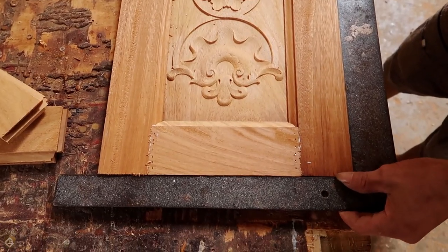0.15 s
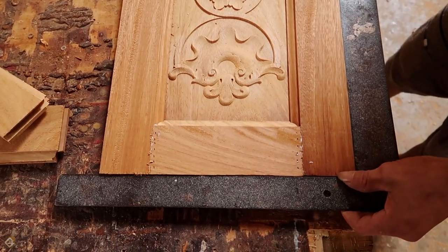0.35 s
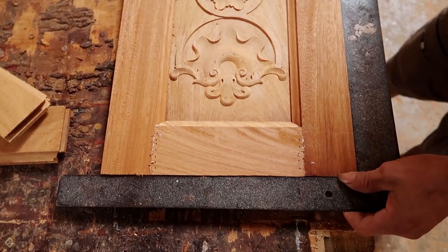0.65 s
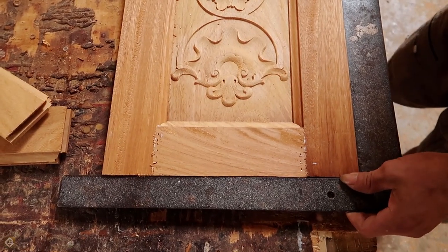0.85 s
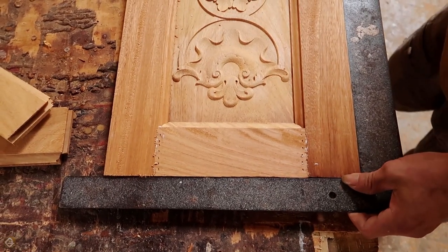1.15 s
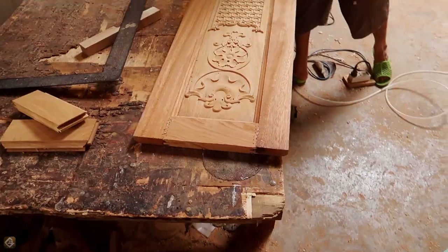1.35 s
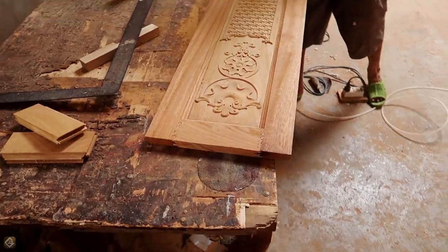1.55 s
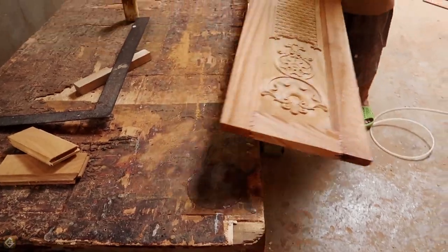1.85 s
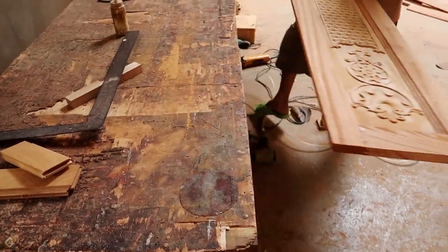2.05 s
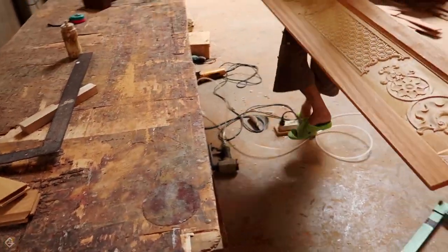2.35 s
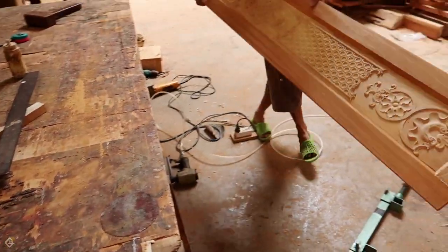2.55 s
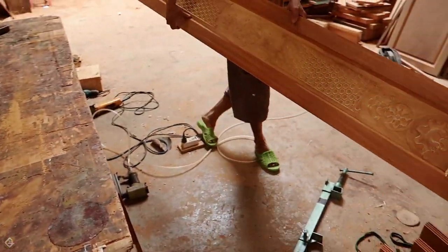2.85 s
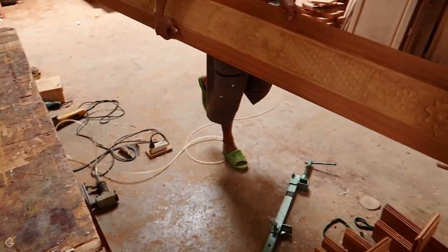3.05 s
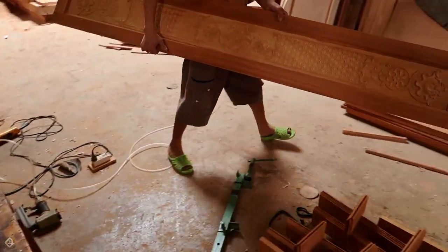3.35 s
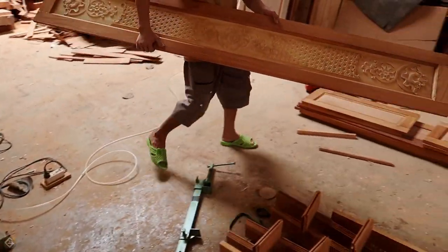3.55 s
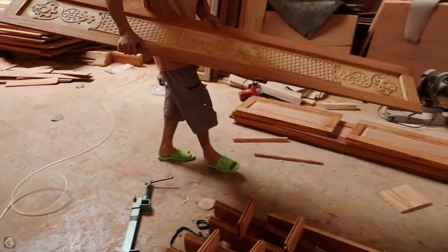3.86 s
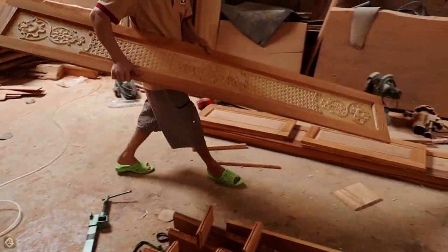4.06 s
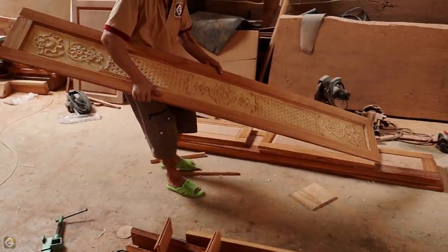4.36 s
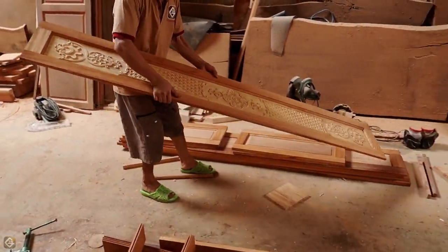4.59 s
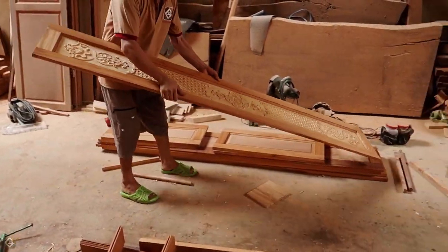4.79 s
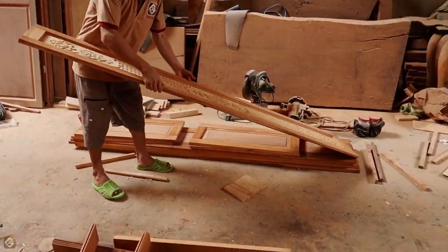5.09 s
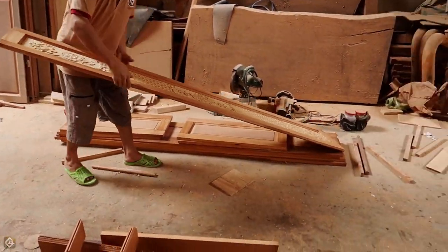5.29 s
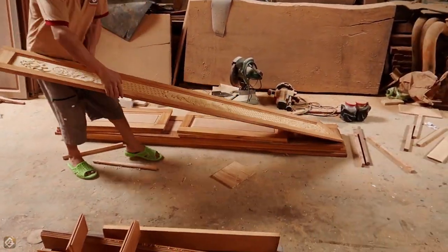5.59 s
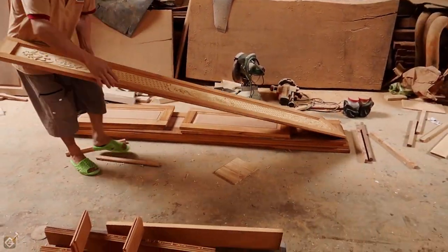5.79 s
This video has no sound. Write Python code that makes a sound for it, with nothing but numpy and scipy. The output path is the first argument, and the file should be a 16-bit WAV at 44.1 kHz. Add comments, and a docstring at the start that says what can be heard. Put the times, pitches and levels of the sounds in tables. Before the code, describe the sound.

Close, dry workshop sound: a rough low buzz with faint irregular rattling runs steadily over a soft hush. Against it come brief bursts of wood handling: bright clicks and a scrape, a solid knock, a crisp scratchy lift with a thin squeak, then one low thump. Mostly motor follows, until the panel is put down with several woody bumps, snaps and final squeaking slides. Nearly central, narrow stereo image.

```python
"""A small motor buzzes close by: one blunt pulse a turn excites its housing, and a loose part knocks on some
turns, as decaying modes. Close at hand, things scrape, click and thump: modulated noise gives gritty scrapes,
resonated bursts and spikes give sharp clicks and snaps, damped low modes give dull thumps, and narrow-band
noise squeaks. A faint hush lies behind."""
import sys
import numpy as np
from scipy.fft import rfft, irfft, next_fast_len
from scipy.io import wavfile
from scipy.ndimage import map_coordinates

SR = 44100
rng = np.random.default_rng(int(sys.argv[2]) if len(sys.argv) > 2 else 0)


def unload_wav(signal):
    """Save mono or channel-first audio to the path in sys.argv[1] as 16-bit WAV at rate SR, clipped to [-1, 1]."""
    wavfile.write(
        sys.argv[1],
        SR,
        np.round(np.clip(np.atleast_2d(signal).T, -1, 1) * 32767).astype(np.int16),
    )


N = 261513
T = np.arange(N) / SR


def amp(db):
    """Level in decibels to amplitude ratio."""
    return 10 ** (np.asarray(db) / 20)


def unit(x):
    """Normalisation to an rms of 1."""
    return x / np.sqrt(np.mean(x ** 2) + 1e-20)


def curves(rows):
    """Linear interpolation in time: one value per sample for each column after the time."""
    s, *columns = np.transpose(rows)
    return [np.interp(T, s, column) for column in columns]


def filtered(x, response):
    """Linear filtering: the spectrum of x times a complex response of frequency."""
    size = next_fast_len(N + SR // 4)
    hz = np.fft.rfftfreq(size, 1 / SR)
    return irfft(rfft(x, size) * response(hz), size)[..., :N]


def colour(points):
    """Spectral envelope: decibels interpolated on a logarithmic frequency axis."""
    f, db = np.transpose(points)
    return lambda hz: amp(np.interp(np.log(hz + 1), np.log(f + 1), db))


def body(peaks):
    """Modal superposition: causal second-order resonances summed with alternating signs."""
    def response(f):
        total = 0
        for k, (centre, width, db) in enumerate(peaks):
            resonance = 1j * f * width / (centre * centre - f * f + 1j * f * width)
            total = total + (-1) ** k * amp(db) * resonance
        return total
    return response


def ringing(modes, t, scatter_db):
    """Free vibration: exponentially damped sines, each struck at a new random strength."""
    total = 0
    for hz, db, t60 in modes:
        strength_db = db + scatter_db * rng.standard_normal()
        total = total + amp(strength_db - 60 * t / t60) * np.sin(2 * np.pi * hz * t)
    return total


def add(track, s, sound):
    """Superposition: mix a sound into the track at time s."""
    part = track[round(s * SR):][:len(sound)]
    part += sound[:len(part)]


def gritty(spectrum, rate, depth_db):
    """Amplitude-modulated noise of rms 1: its level takes a new random value rate times a second."""
    values = rng.standard_normal(int(N * rate / SR) + 4)
    jumps = map_coordinates(values, [T * rate], order=1)
    noise = amp(depth_db * jumps) * rng.standard_normal(N)
    return unit(filtered(noise, colour(spectrum)))


def swell(s, hold, rise, fall):
    """Exponential growth and decay: power climbs to 0 dB at s, holds and sinks, straight in dB."""
    return amp(-rise * np.maximum(s - T, 0) - fall * np.maximum(T - s - hold, 0)) ** 2


def motor():
    """Source and resonator: one push a turn through the housing; knocks fall on whole turns."""
    # nominal speed before alignment to the knocks: time_s, turns_per_s
    speed = [(0, 64), (.22, 68), (.4, 66), (.75, 59), (1, 56.5), (1.3, 55), (1.7, 52.8), (1.9, 53.5),
             (2.3, 60), (3, 60.7), (3.4, 64), (3.8, 61), (3.95, 59), (4.14, 52.8), (4.35, 56), (5.1, 57.5),
             (5.5, 59.5), (5.93, 60)]
    # rms level of the buzz: time_s, level_db
    buzz_level = [(0, -56), (1.2, -59), (4, -57.5), (4.5, -59.5), (5.93, -57.5)]
    # housing resonances: centre_hz, width_hz, gain_db
    housing = [(231, 51, 3.5), (310, 22, -3.5), (427, 40, -2.5), (542, 121, 1), (834, 108, -8),
               (1006, 33, -5.5), (1420, 40, -24)]
    # knocks of the loose part: start_s, level_db
    knocks = [(.0064, -45.5), (0.0858, -48), (0.1612, -45.5), (0.2621, -47), (0.8741, -49.5), (.946, -45.5),
              (1.0187, -45), (1.288, -49), (1.3771, -45.5), (1.4497, -48.5), (1.5816, -52.5), (1.6392, -55),
              (1.695, -55.5), (1.8092, -52.5), (1.8658, -51), (1.922, -46.5), (2.403, -48), (2.502, -46),
              (2.616, -47.5), (2.7137, -44.5), (2.8125, -45.5), (2.929, -45.5), (3.028, -45),
              (3.1258, -47.5), (3.2233, -45.5), (3.318, -46), (3.4103, -44.5), (3.5051, -47), (3.583, -55),
              (3.6966, -48), (3.781, -45.5), (3.8775, -47), (3.962, -46.5), (4.0514, -47), (4.2599, -46.5),
              (4.349, -46), (4.4189, -47.5), (4.492, -49.5), (5.3696, -45.5), (5.453, -46.5), (5.5211, -46)]
    turns = np.cumsum(curves(speed)[0]) / SR
    # shift the turn count so that each knock meets a whole turn
    knock_s = np.transpose(knocks)[0]
    seen = np.interp(knock_s, T, turns)
    whole = np.cumsum(np.r_[0, np.round(np.diff(seen))])
    turns += np.interp(T, knock_s, whole - seen)

    # each push comes 0.04 turn ahead of the whole turn, with jitter of 0.15 ms and 1.5 dB
    starts = np.flatnonzero(np.diff(np.floor(turns + .04)) > 0)
    late, size = rng.standard_normal((N // 600, 2))[:len(starts)].T
    jitter = np.round(.00015 * SR * late).astype(int)
    pushes = np.zeros(N)
    pushes[np.clip(starts + jitter, 0, N - 1)] = amp(1.5 * size)
    # noisy chatter dies away within each turn
    chatter = .03 * np.exp(-(turns % 1) / .3) * rng.standard_normal(N)
    buzz = amp(curves(buzz_level)[0]) * unit(filtered(pushes + chatter, body(housing)))

    shove_db = 38.5  # impulse into the housing, over the knock
    rattle_mean_db, rattle_scatter_db = -11.5, 1.5  # rattle relative to the knock
    # second landing relative to the first
    rebound_s, rebound_db, rebound_scatter_db, rebound_rattle_db = 0.053, -9, 4.2, -4.5
    shoves = np.zeros(N)
    for s, db in knocks:
        rattle_db = rattle_mean_db + rattle_scatter_db * rng.standard_normal()
        shoves[round(s * SR)] = amp(db + shove_db)
        add(buzz, s, knock(db, rattle_db))
        # the part rebounds and lands again, as a rule more softly
        landing_db = db + rebound_db + rebound_scatter_db * rng.standard_normal()
        add(buzz, s + rebound_s, knock(landing_db, rattle_db + rebound_rattle_db))
    return buzz + filtered(shoves, body(housing))


def hush(level_db, rate):
    """Broadband background: coloured noise of slowly fluctuating level."""
    # spectral envelope of the hush: frequency_hz, relative_density_db
    air = [(150, -17.5), (300, -5), (600, -2), (1100, -21.5), (1500, -12.5), (2200, -20.5), (3500, -27),
           (5200, -24.5), (7300, -26), (11000, -34), (16000, -34)]
    return amp(level_db) * gritty(air, rate, depth_db=5.5)


def dragging():
    """Sliding friction: grit crackles, a duller noise hisses and a low rumble swells beneath."""
    # strokes: full_level_s, hold_s, rise_db_per_s, fall_db_per_s, grit_db, hiss_db, rumble_db
    strokes = [(0, 0.22, 60, 33, -72.5, -64, -61.5), (.46, 0.043, 64, 60, -64, -59, -53),
               (0.575, 0.044, 316, 96, -51, -46.5, -44), (0.96, 0.24, 20, 49, -66.5, -59, -59),
               (2.009, 0.011, 395, 114, -40.5, -41.5, -46.5), (2.135, 0.086, 148, 88, -48.5, -47, -51),
               (2.4, 0.16, 153, 40, -70, -66, -59.5), (3.495, 0.36, 14.5, 32, -67.5, -64, -63.5),
               (4.125, 0.028, 67, 86, -61.5, -60, -59.5), (4.555, 0.0079, 280, 108, -51.5, -51, -48),
               (4.695, 0.013, 94, 198, -54, -56, -39.5), (4.762, 0.092, 400, 44, -57, -49, -51.5),
               (5.056, 0.077, 73, 121, -61.5, -55.5, -52), (5.575, .03, 900, 100, -59, -56, -66),
               (5.631, 0.085, 300, 79, -45, -47, -53), (5.784, 0.078, 114, 77, -43, -42.5, -51)]
    # spectral envelope of crackling grit: frequency_hz, relative_density_db
    grit_spectrum = [(1760, -13), (3000, -5.5), (3810, -3.5), (4260, -5), (5180, -10.5), (6000, -5.5),
                     (7200, -3), (8640, -5.5), (10100, -6.5), (11000, -12), (12100, -14), (13900, -16.5),
                     (16000, -30)]
    # spectral envelope of the duller hiss: frequency_hz, relative_density_db
    hiss_spectrum = [(150, -0.5), (250, 6), (280, 3.5), (429, -1), (854, -1.5), (1450, -1.5), (2710, -7),
                     (3840, -16.5), (5000, -7.5), (6500, -9.5), (11000, -120)]
    # spectral envelope of the rumble: frequency_hz, relative_density_db
    rumble_spectrum = [(12, -33), (20, -36), (43, -5), (70, 2.5), (187, -5.5), (259, -8), (290, -6),
                       (600, -10.5), (780, -49), (1320, -120)]
    floor_db = -71.5  # steady rumble, also between strokes
    # independent strokes add in power
    power = sum(amp(row[4:])[:, None] ** 2 * swell(*row[:4]) for row in strokes)
    grit_level, hiss_level, rumble_level = np.sqrt(power)
    grit = grit_level * gritty(grit_spectrum, rate=600, depth_db=3.0)
    dull = hiss_level * gritty(hiss_spectrum, rate=400, depth_db=3.0)
    rumble_level = np.hypot(rumble_level, amp(floor_db))
    return grit + dull + rumble_level * gritty(rumble_spectrum, rate=35, depth_db=2.0)


def knock(db, rattle_db):
    """Impact and free vibration: the loose part rings, with a short dry rattle."""
    # ring modes: frequency_hz, mean_level_db, t60_s
    ring_modes = [(1400, -10.5, 0.047), (1502, -3.5, 0.024), (1980, -14.5, 0.021), (2684, -13, 0.017)]
    # rattle modes: frequency_hz, mean_level_db, t60_s
    rattle_modes = [(3980, -5, .02), (5265, -1, .03), (6300, -5, .022), (7300, -3, .025), (8640, -8, .02),
                    (12050, -6, .017), (13500, -9, .017)]
    t = T[:SR // 15]
    # summing neighbouring samples softens the top of the noise
    soft_noise = np.convolve(rng.standard_normal(len(t)), [1, 1], "same")
    hiss = soft_noise * amp(-60 * t / .024)
    rattle = ringing(rattle_modes, t, scatter_db=5) + 1.2 * hiss
    return amp(db) * (ringing(ring_modes, t, scatter_db=1.4) + amp(rattle_db) * rattle)


def thumps():
    """Soft impact: a push and its recoil, a low damped ring, and a noisy shudder."""
    # contacts: start_s, level_db, pitch_hz, t60_s
    contacts = [(.02, -47, 69, 0.055), (0.338, -42, 300, .019), (.479, -33, 126, 0.041),
                (.535, -39, 62, .29), (1.083, -17, 440, 0.0071), (1.0832, -30.5, 202, 0.079),
                (1.0897, -29, 296, 0.033), (1.0932, -32, 444, 0.021), (1.108, -30, 450, 0.022),
                (1.137, -32.5, 180, 0.047), (1.179, -41, 107, 0.076), (2.034, -34.5, 490, 0.094),
                (2.14, -57, 1860, .038), (2.18, -45.5, 1700, 0.029), (2.245, -40.5, 720, 0.043),
                (2.495, -24, 104, 0.056), (2.529, -42, 61.4, 0.13), (3.665, -36.5, 55.4, 0.086),
                (3.777, -35, 170, 0.065), (4.563, -31, 128, 0.09), (4.584, -26, 370, 0.0073),
                (4.61, -27, 254, 0.051), (4.646, -24, 150, .05), (4.667, -25, 207, 0.068),
                (4.7, -30, 222, 0.046), (4.856, -37, 890, 0.019), (5.07, -37, 356, 0.046),
                (5.124, -29, 326, 0.01), (5.126, -36, 70, 0.052)]
    shudder_modes = [(377, 42, 4.0), (680, 160, 3.5), (1010, 560, -2.5), (1590, 650, -7)]  # Hz, width Hz, dB
    # time constant of the onset: cycles of the pitch, or a share of t60 if that is shorter
    rise_cycles, rise_share = 0.37, 0.061
    out, shake, t = np.zeros(N), np.zeros(N), T[:SR // 4]
    for s, db, hz, t60 in contacts:
        phase = 2 * np.pi * hz * t
        push = 2.3 * phase * (2 - phase) * np.exp(-phase)
        onset = 1 - np.exp(-t / min(rise_cycles / hz, rise_share * t60))
        ring = ringing([(hz, -3, t60), (0.6 * hz, -8, t60)], t, scatter_db=3.5)
        add(out, s, amp(db) * onset * (push + ring))
        # higher-pitched contacts shudder more
        shudder = onset * amp(-60 * t / (2.17 * t60)) * rng.standard_normal(len(t))
        add(shake, s, amp(db) * hz / 300 * shudder)
    return out + 1.45 * filtered(shake, body(shudder_modes))


def snaps():
    """Impulse response: grit breaks under an edge, one spike with two weaker ones right behind."""
    # snaps: start_s, relative_level_db
    breaks = [(0.5527, -21), (0.63, -37.5), (0.7086, -35), (1.1343, -44), (2.0089, -26), (2.128, -26),
              (2.3052, -30), (2.966, -35.5), (4.724, -22), (4.7704, -17.5), (4.88, -33), (4.915, -17.5),
              (5.0493, -28), (5.6429, -35), (5.668, -32), (5.6884, -29)]
    spikes = np.zeros(N)
    for s, db in breaks:
        after = np.cumsum(rng.integers(12, 40, size=2))  # delays in samples
        spikes[round(s * SR) + np.r_[0, after]] = amp(db) * np.array([1, -.5, .25])
    return 3 * filtered(spikes, body([(1500, 1500, -4), (7000, 5000, 0)]))


def clicks():
    """Impact excitation: a dying noise burst through bright resonances and through duller ones."""
    # edges clicking on each other: start_s, edge_drive_db, dull_drive_over_edge_db
    contacts = [(0.5543, -12, -15.5), (0.5743, -22.5, -3.5), (.5914, -32, -6), (0.6291, -33, 0.5),
                (.6958, -31.5, -20), (0.708, -37.5, 2), (.7414, -45.5, -3), (.815, -41, -5),
                (.9263, -33.5, -10.5), (0.973, -32.5, -19), (0.9877, -28.5, -13), (1.0237, -33.5, -8),
                (1.1215, -39.5, -2), (1.1343, -30, -12), (1.1912, -36, -7), (1.9548, -38.5, -4),
                (1.9734, -21.5, -14.5), (1.9924, -30, -16), (2.0101, -11, -10), (2.0364, -39, 3),
                (2.088, -22.5, -10), (2.1199, -22, -8.5), (2.13, -12.5, -14), (2.1514, -34, 1),
                (2.1754, -26, -4), (2.2364, -50, 8), (2.2587, -35, -5), (2.2672, -25.5, -16),
                (2.3033, -29.5, -14), (2.9633, -46.5, 7), (4.6128, -43, 8), (4.6312, -32, -1.5),
                (4.666, -39, -3.5), (4.7226, -37.5, 6.5), (4.7698, -23, -6), (4.8537, -36, -2),
                (4.8773, -46, -18), (4.9147, -28, 0.5), (4.9254, -23, -9), (4.9357, -22.5, -3),
                (4.9758, -29, -3.5), (5.0491, -31, -20), (5.3547, -53, 1), (5.554, -34, -13),
                (5.5965, -34, -2.5), (5.6289, -41, 9), (5.6417, -30, 1), (5.668, -22, -10.5),
                (5.6784, -32, -0.5), (5.6884, -24, -5), (5.7204, -29, -2), (5.7514, -28.5, -0.5),
                (5.7723, -26.5, -20), (5.8241, -24, -16)]
    # thin edge resonances: centre_hz, width_hz, gain_db
    edge_modes = [(6180, 1000, -9), (7780, 210, -3.5), (8400, 470, -3.5), (9030, 780, -4),
                  (10100, 580, -6.5), (12400, 2300, -20.5)]
    # duller resonances: centre_hz, width_hz, gain_db
    dull_modes = [(810, 630, -2), (1825, 330, 2), (2230, 315, 1), (2840, 710, -1.5), (4060, 1950, -5.5)]
    quick_t60_s, tail_t60_s, tail_share = 0.017, 0.17, 0.55
    edge, dull, t = np.zeros(N), np.zeros(N), T[:SR // 5]
    fade = amp(-60 * t / quick_t60_s) + tail_share * amp(-60 * t / tail_t60_s)
    for s, db, dull_db in contacts:
        burst = fade * rng.standard_normal((2, len(t)))
        burst[:, 0] += 3.5  # sharp initial impulse
        add(edge, s, amp(db) * burst[0])
        add(dull, s, amp(db + dull_db) * burst[1])
    return filtered(edge, body(edge_modes)) + filtered(dull, body(dull_modes))


def squeak():
    """Stick-slip friction: jumpy noise in two close resonances of the dragged edge."""
    # squeaks: full_level_s, hold_s, level_db
    squeaks = [(.96, 0.077, -75), (1.122, 0.046, -58.5), (1.19, 0.032, -60.5), (2.01, 0.063, -54),
               (2.14, 0.086, -53), (2.3, .07, -63), (5.06, 0.084, -66.5), (5.645, 0.105, -50.5),
               (5.777, 0.086, -47.5)]
    rise, fall = 800, 470  # dB per s
    level = np.sqrt(sum(amp(db) ** 2 * swell(s, hold, rise, fall) for s, hold, db in squeaks))
    slips = gritty([(100, 0), (20000, 0.018)], rate=130, depth_db=7.0)
    return level * unit(filtered(slips, body([(8130, 130, 2), (8370, 220, 4)])))


def scene():
    """Sum and difference stereo: all is central, but motor and hush differ between the sides."""
    # share of the motor that differs between the sides: frequency_hz, gain_db
    side_share = [(60, -45), (200, -21), (450, -14), (1000, -23), (1500, -12), (3500, -17), (7000, -9.5),
                  (14000, -18)]
    machine = motor()
    nearby = clicks() + snaps() + thumps() + dragging() + squeak()
    middle = machine + nearby + hush(-63, rate=17)
    delayed = np.roll(machine, 25)  # samples
    side = filtered(delayed, colour(side_share)) + hush(-73, rate=16)
    return np.array([middle + side, middle - side])


def record(dry):
    """Band limitation: the recorder keeps nothing from 15.9 kHz up."""
    top_hz = 15900
    return filtered(dry, lambda hz: hz < top_hz)


dry = scene()
out = record(dry)
unload_wav(out)
```